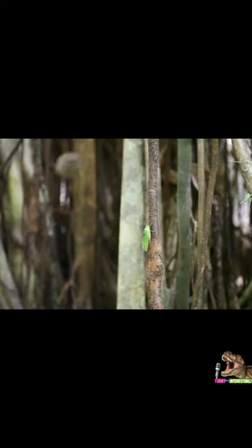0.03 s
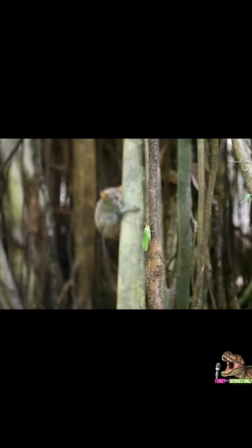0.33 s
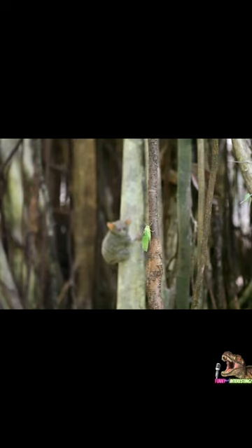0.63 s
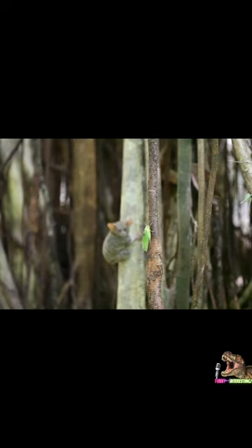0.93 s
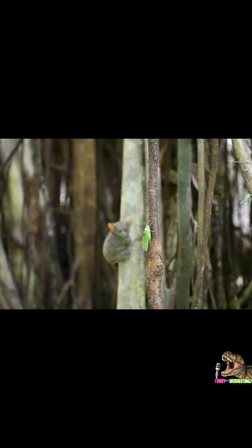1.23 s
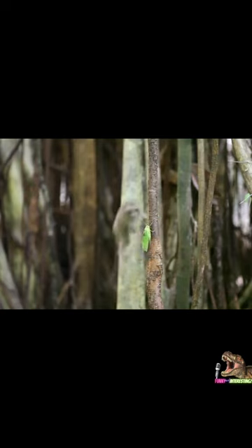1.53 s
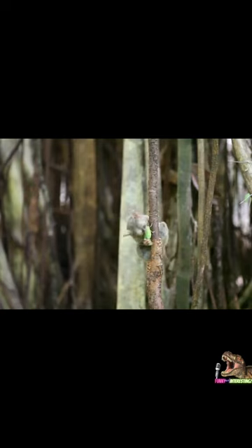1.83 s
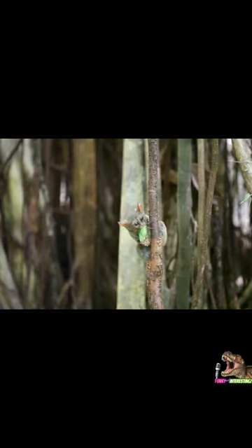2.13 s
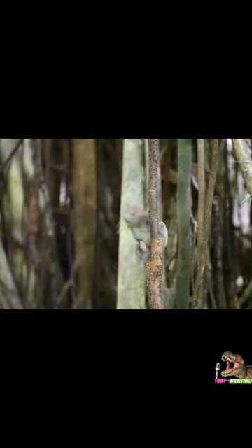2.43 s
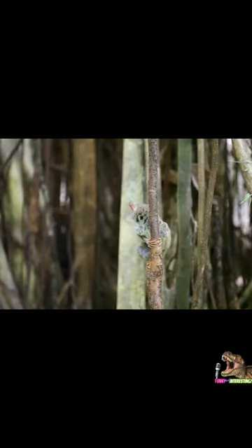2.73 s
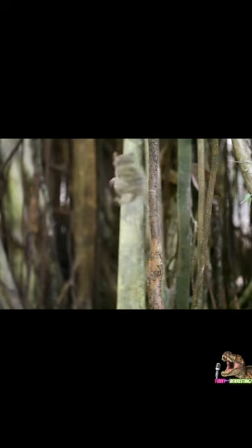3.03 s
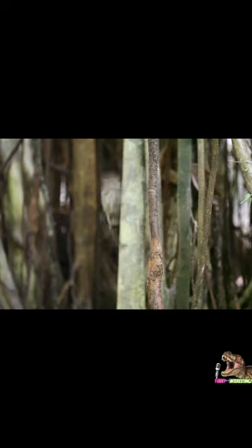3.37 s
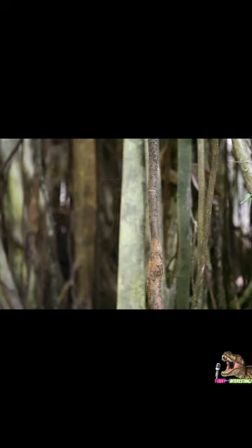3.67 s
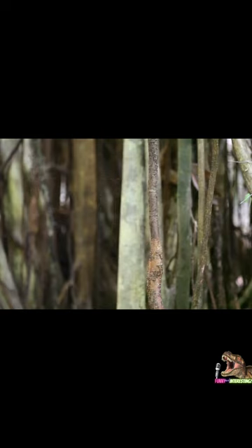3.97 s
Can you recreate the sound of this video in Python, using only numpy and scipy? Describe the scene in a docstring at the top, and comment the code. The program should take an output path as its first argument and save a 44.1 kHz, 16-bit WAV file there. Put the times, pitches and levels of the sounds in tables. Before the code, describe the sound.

A camera shutter fires three times, loud and close, at about 2, 2.5 and 3 seconds. Each shot opens with a sharp click and closes with a clatter and a brief winding motor whirr, ending by 3.6 seconds. High forest insects drone throughout, swelling and fading over a softer pulsing buzz. From about 1.7 to 2.5 seconds a small animal scratches at dry bark.

```python
"""Insects drone in a forest throughout, their chorus waxing and waning. A small animal lands on a trunk
and scrabbles at the bark. While it still scratches, a reflex camera takes the first of three slow
exposures. Each opens with the slap of the mirror and a curtain tick, and closes with a clatter and the
whirr of the winding motor. The loudest clicks overload the recorder."""
import sys
import numpy as np
from scipy import signal
from scipy.fft import rfft, irfft
from scipy.io import wavfile
from scipy.ndimage import uniform_filter1d, minimum_filter1d

SR = 44100
rng = np.random.default_rng(int(sys.argv[2]) if len(sys.argv) > 2 else 0)


def materialize(psi):
    """Save the field psi as 16-bit PCM at rate SR to the path in sys.argv[1].

    A 1-D psi becomes a single channel; in a 2-D psi each row is a channel.
    """
    bounded = np.clip(np.atleast_2d(psi).T, -1, 1)
    quanta = np.round(bounded * 32767).astype(np.int16)
    wavfile.write(sys.argv[1], SR, quanta)


N = 176400
T = np.arange(N) / SR

# exposures: mirror lift t/s, curtain opening t/s, mirror release t/s, closing level/dB
EXPOSURES = [(2.0309, 2.095, 2.3675, 3.5), (2.536, 2.608, 2.8798, 1), (3.0490, 3.119, 3.4152, 0.5)]
# resonances of the camera body: f/Hz, width/Hz, gain/dB
BODY_RESONANCES = [(906, 45, 8), (1330, 134, -8), (1553, 45, 5.5), (1903, 77, 4), (6790, 130, 2.5),
                   (10630, 280, 4)]


def from_db(db):
    """Amplitude ratio: a factor of ten for every 20 dB."""
    return 10 ** (np.asarray(db) / 20)


def unit_power(x):
    """Normalisation to a mean square of one."""
    return x / np.sqrt(np.mean(x ** 2) + 1e-20)


def curve(rows, t=T, column=1):
    """Linear interpolation of one table column in time."""
    rows = np.array(rows)
    return np.interp(t, rows[:, 0], rows[:, column])


def colour(x, spectrum, resonances=(), size=4096):
    """Minimum-phase filter of unit power gain: the spectrum's levels are relative."""
    hz, points = np.fft.rfftfreq(size, 1 / SR) + 1, np.array(spectrum)
    db = np.interp(np.log(hz), np.log(points[:, 0]), points[:, 1])
    for centre, width, gain_db in resonances:
        db = db + gain_db / (1 + (2 * (hz - centre) / width) ** 2)
    cepstrum = irfft(np.log(from_db(db)))
    cepstrum[1:size // 2] *= 2  # folding makes the response causal
    cepstrum[size // 2 + 1:] = 0
    response = irfft(np.exp(rfft(cepstrum)))
    return signal.fftconvolve(x, response / np.linalg.norm(response))[:len(x)]


def band_noise(hz, width):
    """Narrow-band noise of unit power: the narrower the band, the slower it fluctuates."""
    detuning = 2 * (np.fft.rfftfreq(N, 1 / SR) - hz) / width
    return unit_power(irfft(rfft(rng.standard_normal(N)) / np.sqrt(1 + detuning ** 4), N))


def grains(per_s, spread_db=2.0):
    """Shot noise of unit power: tiny independent impacts of uneven size."""
    sizes = from_db(spread_db * np.minimum(rng.exponential(1, N), 4)) * rng.choice([-1, 1], N)
    return unit_power(sizes * (rng.random(N) < per_s / SR))


def burst(t, attack, hold, t60):
    """Envelope of a damped vibration: linear rise, hold, exponential decay."""
    return np.clip(t / attack, 0, 1) * from_db(-60 * np.clip((t - attack - hold) / t60, 0, 3))


def forest():
    """Broadband noise: air murmurs and far insects merge into a hiss, with a few narrow-band calls."""
    # spectra: f/Hz, level/dB
    air_spectrum = [(15, -15), (35, -7), (60, 1.5), (110, 2), (300, 2.5), (480, 0.5), (800, -3),
                    (1600, -4.5), (3000, -21), (8000, -68)]
    hiss_spectrum = [(900, -60), (2000, -3.5), (2800, -5), (3950, -4.5), (4500, 11), (5100, 2), (5600, 5.5),
                     (6700, 3), (7700, -2.5), (8200, -6.5), (10000, -14), (12000, -19), (16000, -20.5)]
    # envelope of the hiss: t/s, level/dB
    hiss_levels = [(0, -32.5), (2.7, -33), (3.2, -30.5), (3.65, -34), (4, -31)]
    # thin calls: t/s, half length/s, f/Hz, level/dB
    far_calls = [(.7, .75, 5510, -44), (1.05, 0.097, 7400, -43.5), (1.365, 0.11, 6510, -38),
                 (1.774, 0.14, 5390, -36)]
    air = from_db(-41.5) * colour(rng.standard_normal(N), air_spectrum)
    calls = sum(from_db(db) * np.exp(-((T - at) / half) ** 4) * band_noise(hz, width=34)
                for at, half, hz, db in far_calls)
    hiss = from_db(curve(hiss_levels)) * colour(rng.standard_normal(N), hiss_spectrum)
    return air + calls + hiss


def cicadas():
    """Incoherent voices add to bands of noise: a chorus waxes and wanes, and a higher cicada joins."""
    # voices of the chorus: f/Hz, width/Hz, relative level/dB
    voices = [(4450, 250, 6), (4665, 200, 13.5), (4820, 45, 1.5)]
    # envelopes: t/s, level/dB
    chorus_levels = [(0, -34), (.6, -29.5), (.67, -25.5), (.9, -21.5), (1.08, -21.5), (1.2, -32),
                     (1.42, -29.5), (1.6, -24.5), (1.85, -25), (2.15, -32), (2.75, -34.5), (2.95, -21.5),
                     (3.2, -19.5), (3.33, -28), (3.7, -31), (3.88, -21.5), (4, -24)]
    soloist_levels = [(0, -70), (.7, -41), (1.1, -40), (1.3, -56), (2.9, -48), (3.1, -27.5), (3.7, -29),
                      (4, -26)]
    chorus = unit_power(sum(from_db(db) * band_noise(hz, width) for hz, width, db in voices))
    soloist = band_noise(hz=5017, width=78)
    return from_db(curve(chorus_levels)) * chorus + from_db(curve(soloist_levels)) * soloist


def buzzing_insect():
    """Amplitude modulation: the partials of a lower buzz swell together about twice a second."""
    # swells: t/s, level/dB
    swells = [(.32, -7.5), (.8, -7.5), (1.27, -7.5), (1.74, -7), (2.22, -12), (2.72, -14.5), (3.2, -21),
              (3.6, -18), (3.96, -9.5)]
    # partials: f/Hz, width/Hz, level/dB
    partials = [(1095.4, 37, -38), (2220, 39.4, -31.5), (2185, 240, -36), (2410, 170, -36.5),
                (3190, 300, -32), (3309, 94, -28), (3520, 22, -39)]
    half_length_s, floor_db = .118, -14
    swell = sum(from_db(db) / (1 + ((T - at) / half_length_s) ** 4) for at, db in swells)
    buzz = sum(from_db(db) * band_noise(hz, width) for hz, width, db in partials)
    return np.hypot(swell, from_db(floor_db)) * buzz


def animal():
    """Impulsive excitation: claws snap on dry bark amid fine crackle, while foliage brushes softly."""
    # claw strikes and crackle envelope: t/s, level/dB
    scratches = [(1.674, -21), (1.8405, -9), (1.8682, -11), (1.8768, -11), (1.912, -2.5), (1.931, -3),
                 (1.937, -12), (1.9922, -15), (2.0005, -3), (2.0052, -9), (2.023, -17), (2.2975, -12),
                 (2.3128, -11), (2.463, -9), (2.470, -11)]
    crackle_levels = [(1.65, -45), (1.685, -27), (1.73, -55), (1.83, -37), (1.875, -26), (1.905, -25),
                      (1.938, -18), (1.968, -34), (2.008, -20.5), (2.05, -29), (2.27, -52), (2.32, -26),
                      (2.445, -27), (2.467, -14.5), (2.53, -60)]
    # brushes of foliage: t/s, half length/s, level/dB
    brushes = [(1.688, 0.037, -39), (3.844, 0.032, -33), (3.975, 0.031, -33.5)]
    # spectra: f/Hz, level/dB
    bark_spectrum = [(200, -24.5), (1700, -16), (2400, -9.5), (3700, -4.5), (5900, 5), (7400, 2.5),
                     (8600, -5.5), (11300, -12.5), (16000, -26.5)]
    foliage_spectrum = [(100, -22), (320, 10), (650, -7), (1200, 4), (2500, -2), (6000, -25), (16000, -40)]
    snaps = sum(from_db(db) * burst(T - at, attack=.0003, hold=.0008, t60=.006) for at, db in scratches)
    crackle = from_db(curve(crackle_levels)) * grains(per_s=3000)
    brushing = sum(from_db(db) * np.exp(-((T - at) / half) ** 2) for at, half, db in brushes)
    bark = colour(snaps * rng.choice([-1, 1], N) + crackle, bark_spectrum)
    return bark + colour(brushing * rng.standard_normal(N), foliage_spectrum)


def winding_motor():
    """Gear tones follow the turning rate: the rattling train slows under the spring's load, then races."""
    # run, from the mirror's release: t/s, turning rate/Hz, level/dB
    winding = [(-.027, 78, -47), (-.006, 86, 0.5), (.02, 85, 2), (.05, 85.5, 2.5), (.072, 84, 0),
               (.097, 82.5, 0), (.118, 87, -3), (.129, 94, -3), (.139, 82, -9.5), (.147, 100, -23),
               (.168, 63, -21)]
    # gear tones: multiple of the turning rate, level/dB
    gear_tones = [(7.7, -37), (10, -26), (12, -29), (16, -37), (19.6, -34), (23, -27.5), (43, -29.5)]
    # spectrum of the tooth impacts: f/Hz, level/dB
    rattle_spectrum = [(150, -35), (500, -24), (720, -9), (840, -5.5), (1150, 4.5), (1950, 1.5), (2200, -1),
                       (3600, 0), (4200, -11), (6500, -2.5), (8400, -11), (10500, -18.5), (16000, -56)]
    out = np.zeros(N)
    wobble = 1 + .011 * band_noise(hz=0, width=154)
    rattle = from_db(-21.5) * colour(grains(per_s=2500), rattle_spectrum, BODY_RESONANCES)
    for _, _, release, _ in EXPOSURES:
        running = (T > release + winding[0][0]) & (T < release + winding[-1][0])
        t = T[running] - release
        turns = np.cumsum(curve(winding, t) * wobble[running]) / SR
        whine = sum(from_db(db) * np.sqrt(2) * np.sin(2 * np.pi * (multiple * turns + rng.random()))
                    for multiple, db in gear_tones)
        out[running] += from_db(curve(winding, t, column=2)) * (whine + rattle[running])
    return out


def camera_ring():
    """Damped modes: the body rings as the curtain opens, the mirror as it lands on its stop."""
    # modes: f/Hz, level/dB, t60/s
    body_modes = [(880, -25, .07), (1030, -30, .06), (1665, -31, .05)]
    mirror_modes = [(830, -15, .035), (2360, -10, .035), (5600, -15, .035), (5830, -10, .045)]
    body_hold_s, mirror_fall_s = .0094, .0168
    out, t = np.zeros(N), T[:SR // 8]
    for _, opens, release, closing_db in EXPOSURES:
        for start, strike_db, hold, modes in ((opens, 0, body_hold_s, body_modes),
                                              (release + mirror_fall_s, closing_db, 0, mirror_modes)):
            i = int(start * SR)
            for hz, db, t60 in modes:
                envelope = from_db(db + strike_db) * burst(t, .0011, hold, t60)
                out[i:i + len(t)] += envelope * np.sin(2 * np.pi * (hz * t + rng.random()))
    return out


def shutter():
    """Source and filter: each contact rattles small parts, and a duller tail dies away in the body."""
    # spectra of the contacts: f/Hz, level/dB
    lift = [(150, -31), (380, -15), (560, -3), (1000, -4.5), (1350, -3), (1700, -4.5), (4400, -1),
            (5100, -5.5), (6200, -2), (7500, -6.5), (10400, -13), (16000, -32)]
    slap = [(35, -26), (60, -27.5), (350, -9.5), (600, -13.5), (900, -9.5), (1300, -5), (1900, -3.5),
            (2700, -8), (3400, -3.5), (4600, -12.5), (7000, -13), (9000, -18.5), (11000, -31), (16000, -36)]
    curtain = [(100, -30), (300, -1.5), (430, -14.5), (620, -3), (950, -4), (1950, 3), (2700, -2),
               (3300, 0.5), (6000, 1), (8400, -7.5), (10000, -19), (16000, -30)]
    latch = [(150, -37), (450, -27), (800, -28), (2000, -9), (3500, -3.5), (6600, -3), (7900, -5.5),
             (8700, -2), (10000, -10), (16000, -25.5)]
    drop = [(60, -40), (130, -19), (280, -15.5), (440, -16), (800, -2), (1360, -22.5), (2370, -0.5),
            (2800, -8), (4800, -13.5), (5700, 0.5), (7200, -15.5), (10000, -19), (16000, -52)]
    settle = [(100, -23), (250, -18.5), (450, -19), (700, -0.5), (1200, -14), (1950, -5.5), (3000, -9.5),
              (5600, -3), (7500, -9.5), (10000, -32), (16000, -50)]
    # stage (0 lift, 1 opening, 2 release), delay/s, level/dB, attack/s, hold/s, t60/s, tail/dB, spectrum
    contacts = [(0, 0, -6, .0005, .002, .016, -7, lift),
                (0, .0188, -1, .002, .004, .023, -18, slap),
                (1, -.0045, -15, .0005, .002, .02, -12, curtain),
                (1, 0, -9.5, .0003, .0012, .02, -12, curtain),
                (1, .009, -21, .001, .007, .025, -14, curtain),
                (2, -.028, -16.5, .002, .003, .05, -6, curtain),
                (2, -.0225, -11, .0008, .002, .019, -12, curtain),
                (2, .0003, .5, .0002, .0018, .011, -18, latch),
                (2, .0158, -.5, .0005, .003, .023, -18, drop),
                (2, .0295, -14, .0004, .001, .012, -14, settle),
                (2, .038, -8.5, .0005, .002, .019, -11, settle)]
    likeness = .4  # correlation of a contact's rattle between exposures
    out, length = np.zeros(N), SR // 4
    damping = signal.butter(6, 8000, fs=SR, output="sos")
    for stage, delay, db, attack, hold, t60, tail_db, spectrum in contacts:
        force, pattern = np.zeros(N), rng.choice([-1, 1], (2, length))
        for *stage_times, closing_db in EXPOSURES:
            start = stage_times[stage] + delay
            span = slice(int(start * SR), int(start * SR) + length)
            t = T[span] - start
            repeats = rng.random(length) < np.sqrt(likeness)
            hit_noise, tail_noise = np.where(repeats, pattern, rng.choice([-1, 1], (2, length)))
            hit = hit_noise * burst(t, attack, hold, t60)
            tail = signal.sosfilt(damping, tail_noise * burst(t, attack, hold, t60=.14))
            force[span] += from_db(db + closing_db * (stage == 2)) * (hit + from_db(tail_db) * tail)
        out += colour(force, spectrum, BODY_RESONANCES)
    return out


def scene():
    """Mid-side stereo: all sources sit in the centre; the top treble spreads, most for near sounds."""
    near = shutter() + camera_ring() + winding_motor() + animal()
    mid = near + cicadas() + buzzing_insect() + forest()
    # spectrum of the side signal: f/Hz, level/dB
    side_spectrum = [(1500, -49), (2000, -46), (8500, -44), (9200, 1.5), (12000, 3), (16000, 1)]
    treble = signal.sosfilt(signal.butter(6, 9000, "high", fs=SR, output="sos"), mid)
    side_power = (from_db(-7) * treble) ** 2 + (from_db(-23) * near) ** 2
    side_envelope = np.sqrt(np.abs(uniform_filter1d(side_power, size=64)))
    side = colour(side_envelope * rng.standard_normal(N), side_spectrum)
    return np.array([mid + side, mid - side])


def record(dry):
    """Peak limiting: fast gain dips hold the loudest clicks, the excess clips, a low-pass cuts the top."""
    ceiling, window_samples, stopband_hz = 1.03, 45, 16450
    allowed_gain = np.minimum(1, ceiling / (np.abs(dry).max(axis=0) + 1e-9))
    gain = uniform_filter1d(minimum_filter1d(allowed_gain, window_samples), window_samples)
    low_pass = signal.cheby2(16, 60, stopband_hz, fs=SR, output="sos")
    return signal.sosfilt(low_pass, np.clip(dry * gain, -1, 1))


dry = scene()
out = record(dry)
materialize(out)
```